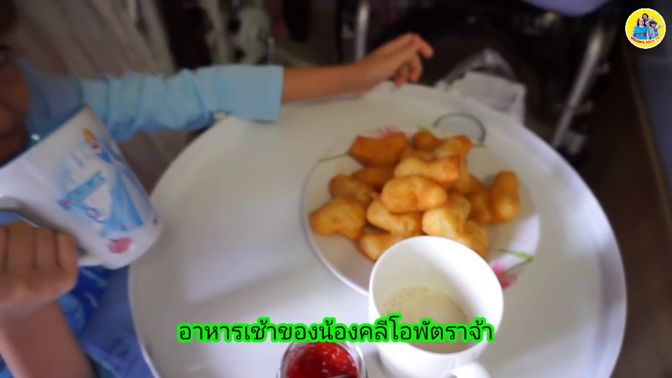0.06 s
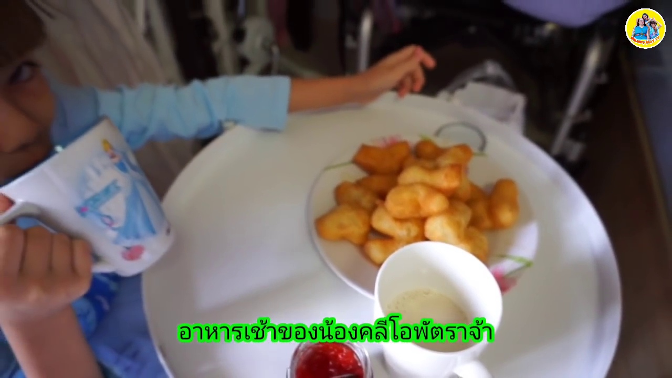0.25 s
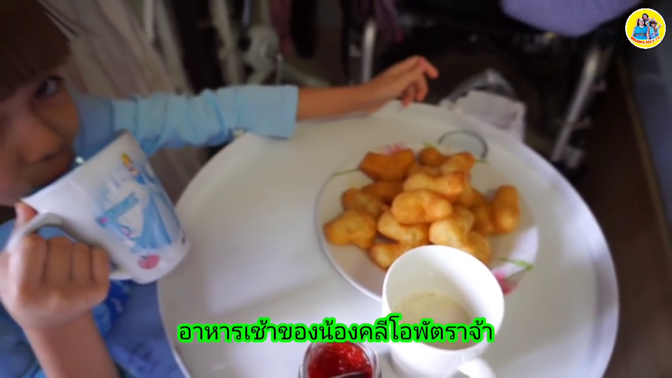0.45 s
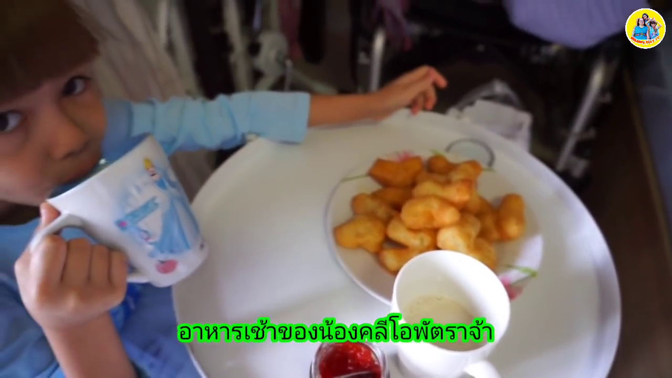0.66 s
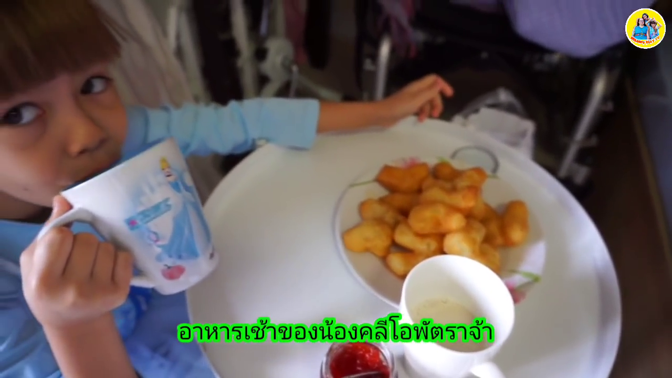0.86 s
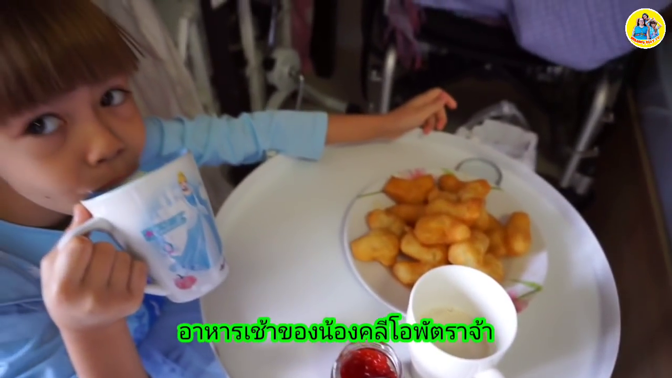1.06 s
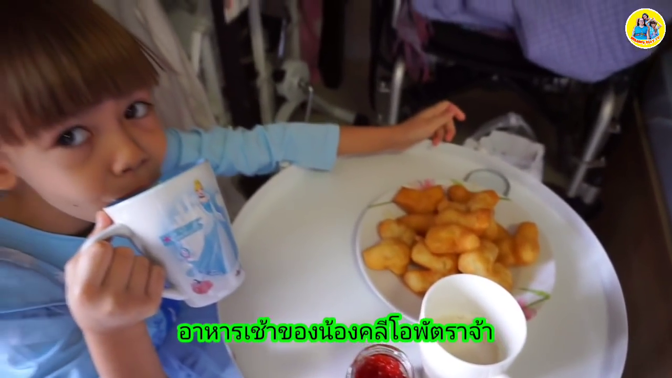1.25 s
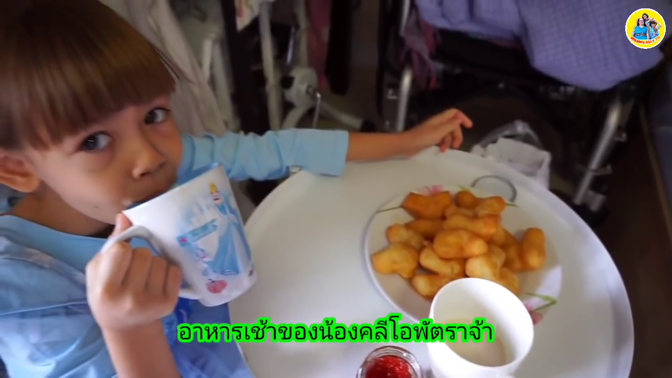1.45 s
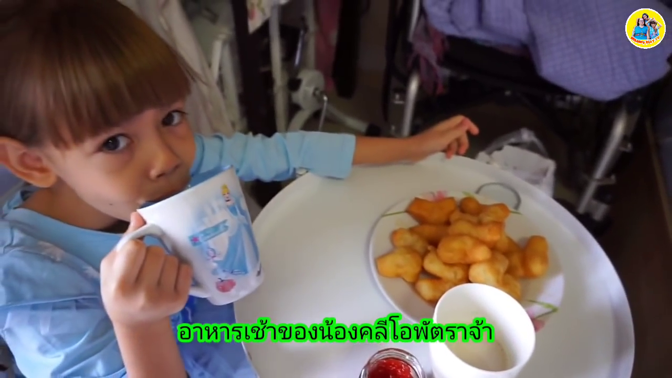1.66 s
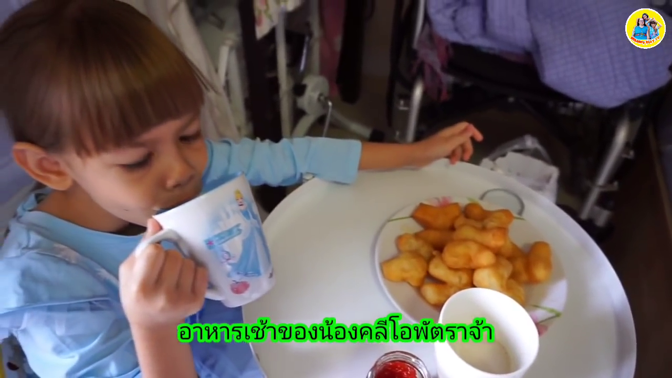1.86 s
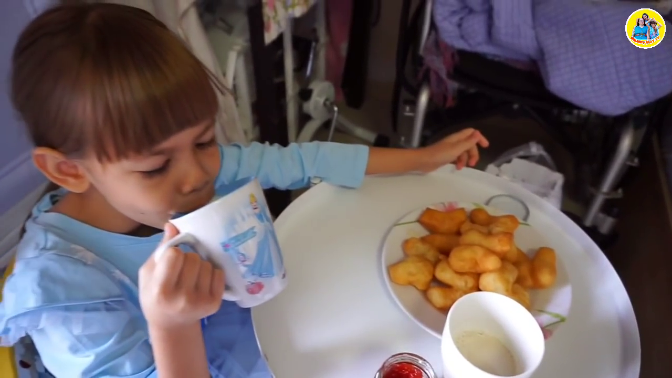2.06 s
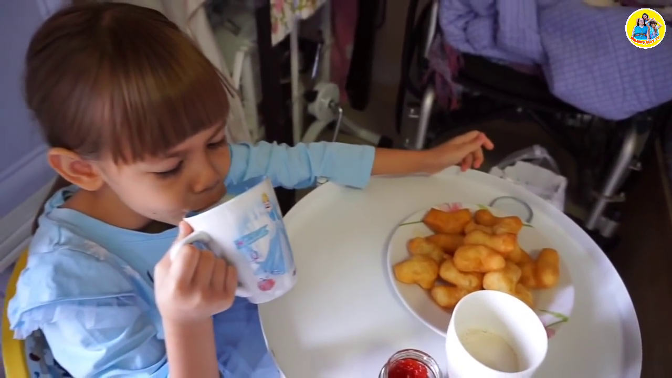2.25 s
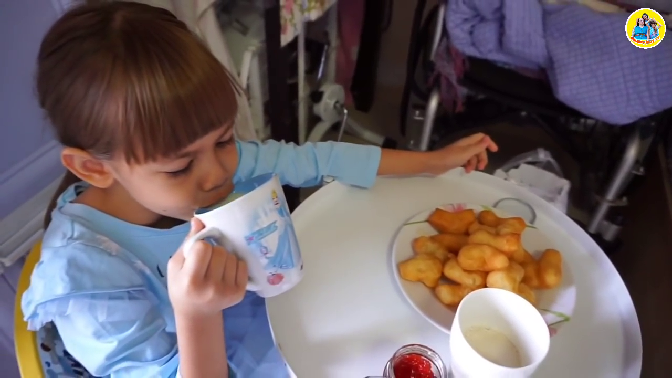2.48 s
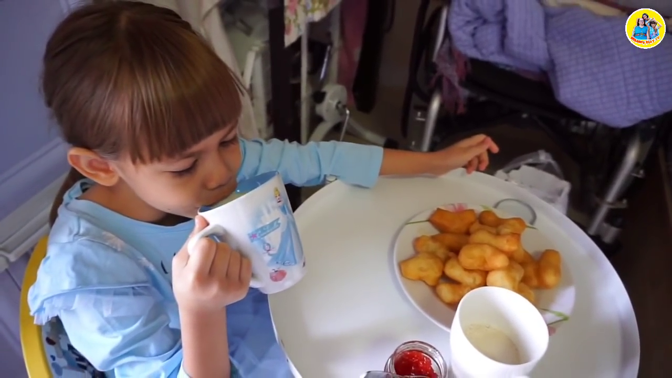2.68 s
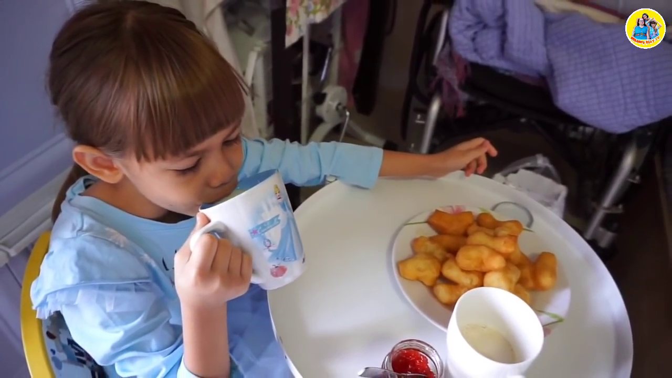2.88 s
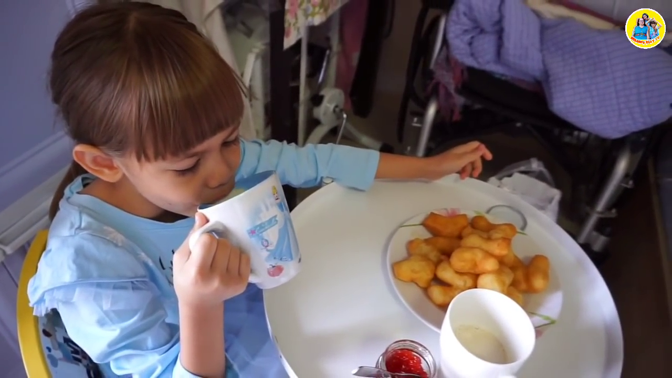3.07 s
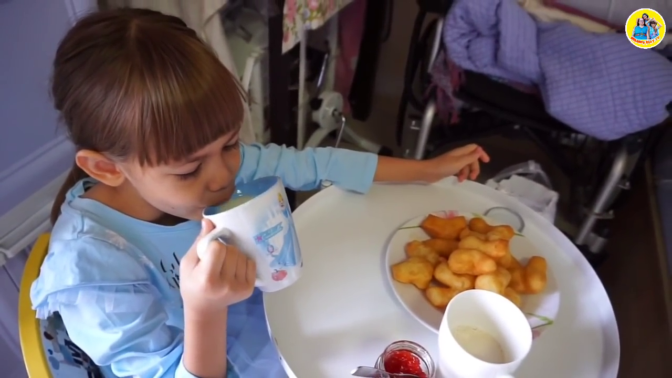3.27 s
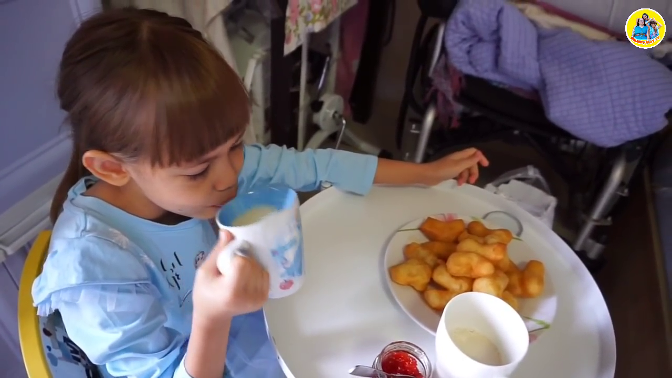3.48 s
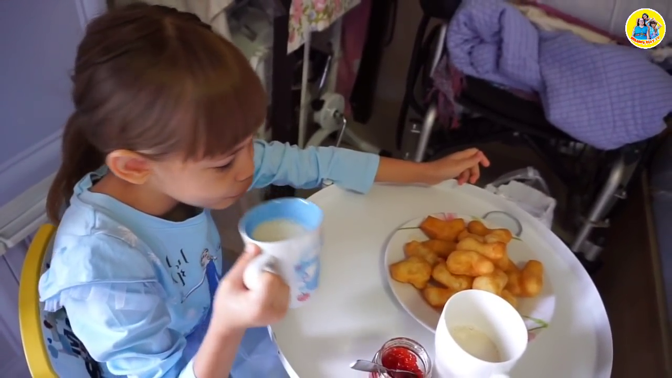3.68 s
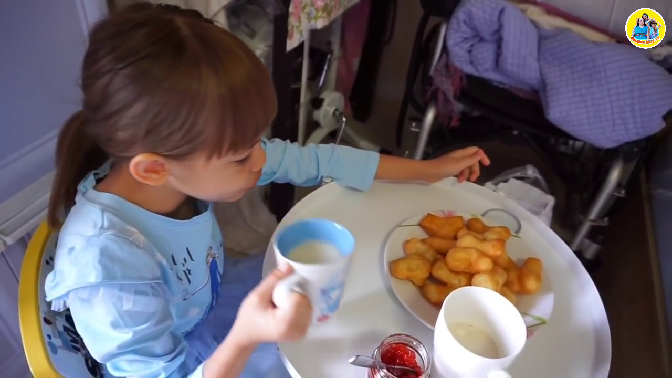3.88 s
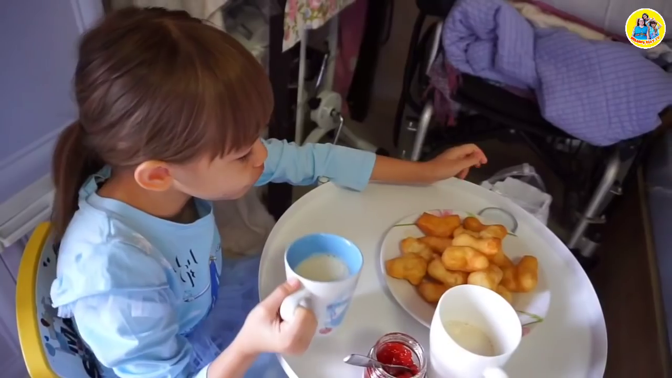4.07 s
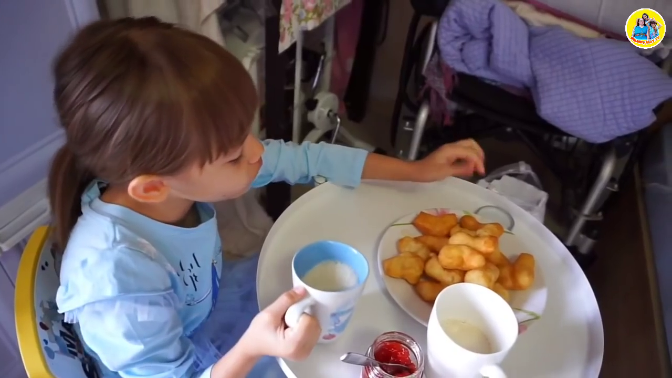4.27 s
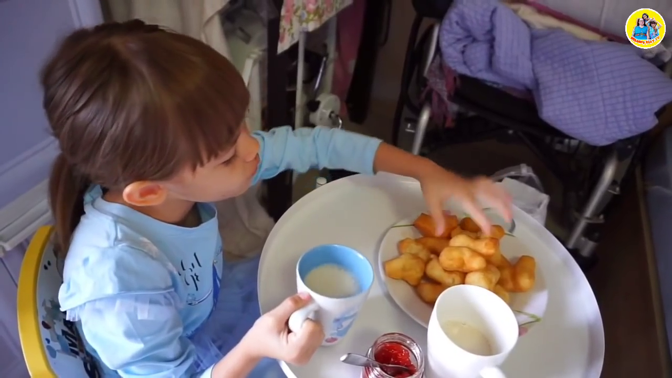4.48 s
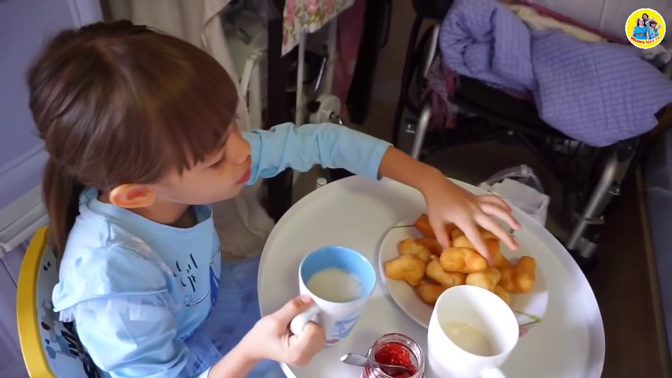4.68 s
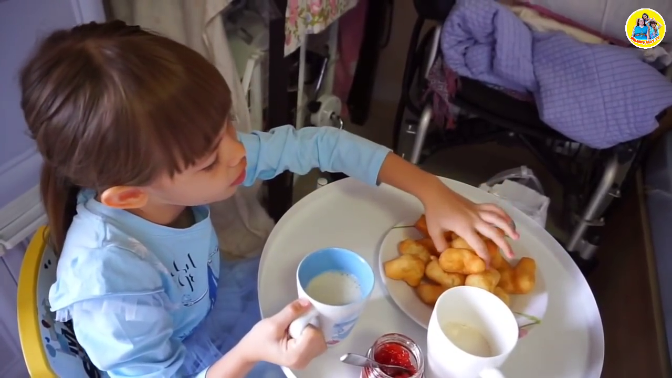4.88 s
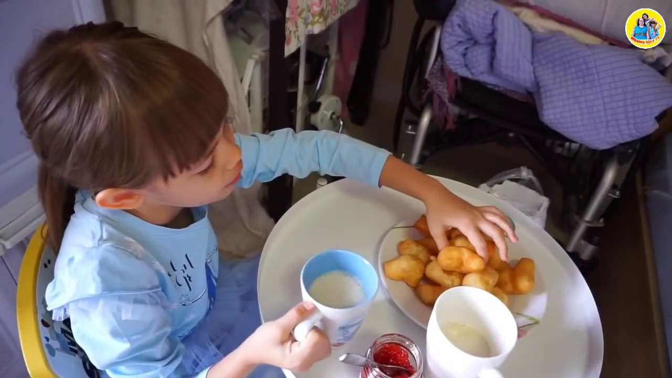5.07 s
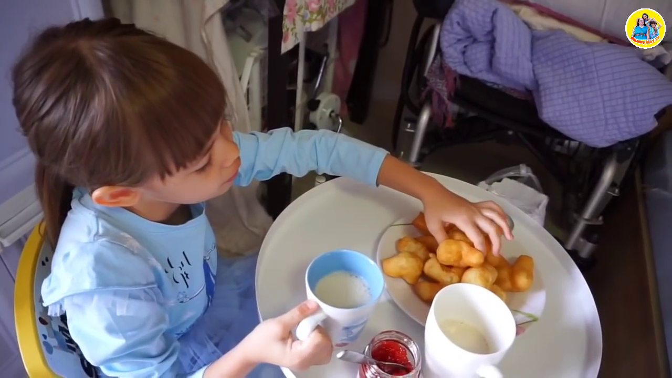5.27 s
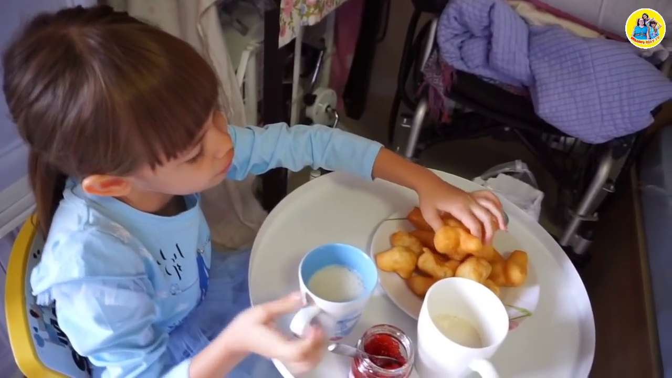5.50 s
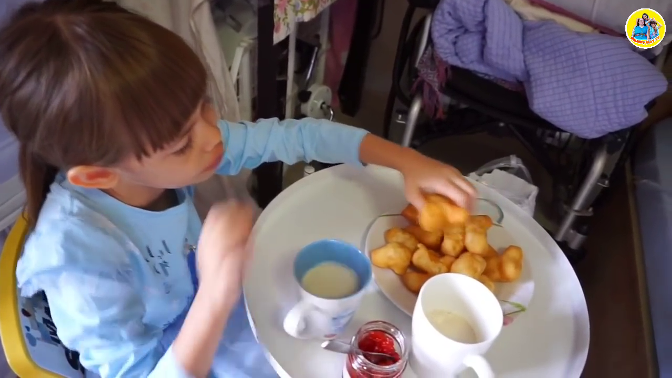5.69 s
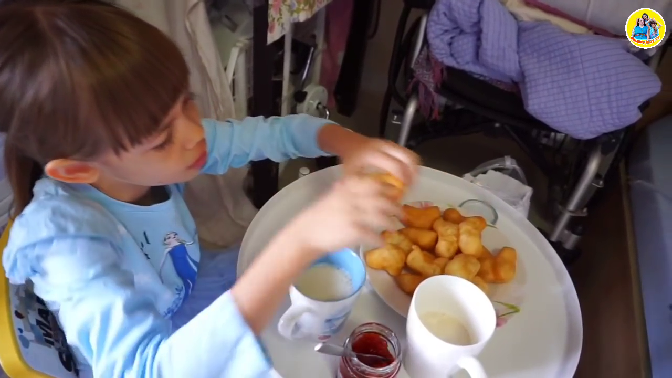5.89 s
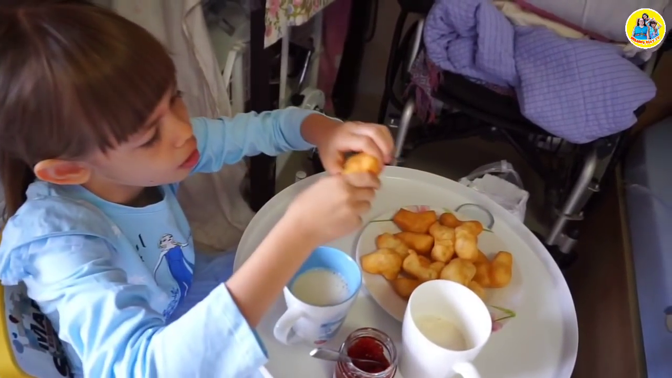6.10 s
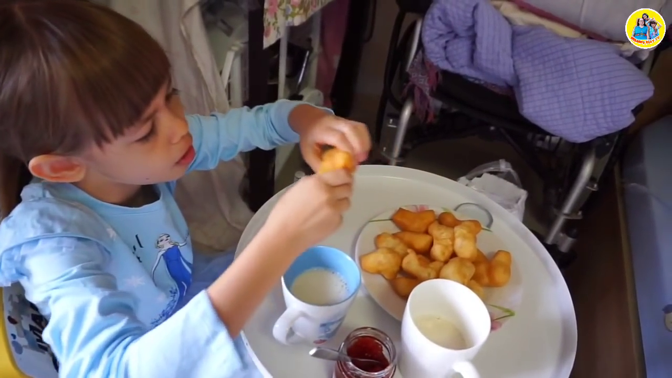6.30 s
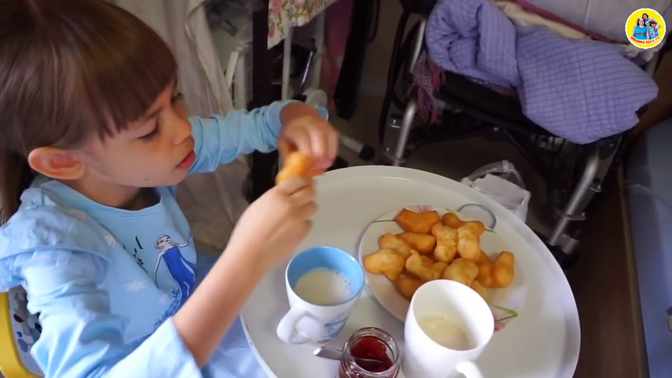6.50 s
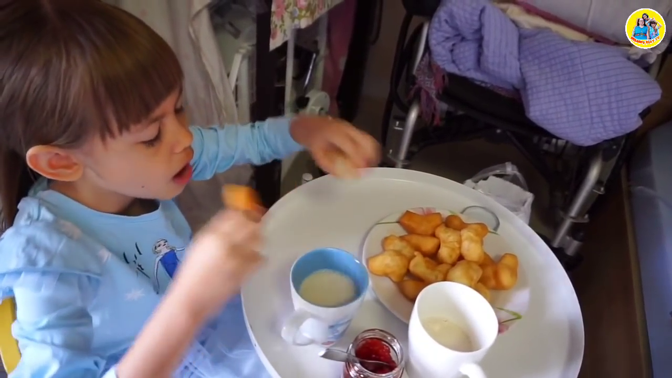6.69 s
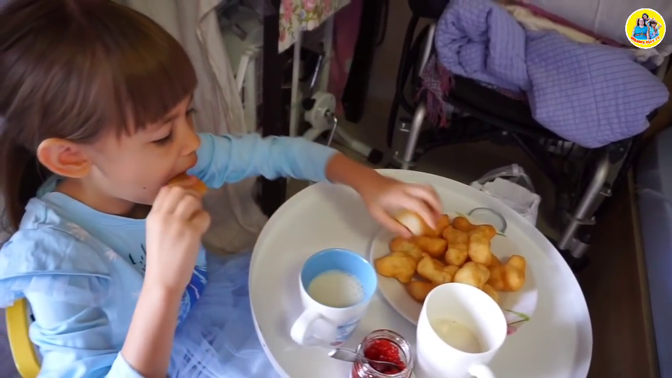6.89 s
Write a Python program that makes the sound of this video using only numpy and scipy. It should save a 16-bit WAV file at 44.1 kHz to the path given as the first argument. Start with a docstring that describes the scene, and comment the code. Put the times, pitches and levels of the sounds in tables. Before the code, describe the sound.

Steady outdoor hiss and thin birdsong through a window; one loud mug knock past the middle, then fingers quietly rustle and tear crisp fried dough.

```python
"""Mug set down on a table

A ceramic mug is set down hard on a light table in a small room, right of a two-port camera microphone: damped
sine partials, a low thud and a dense tail of noise. Steady outdoor hiss (shaped noise) and small birds (gliding
sines, once with a breathy noise smear) come in through a window, over a faint low hum (narrow-band noise).
Fingers rustle and tear crisp fried dough: short noise bursts and showers of grains."""
import sys
import numpy as np
from scipy import signal
from scipy.fft import rfft, irfft, next_fast_len
from scipy.io import wavfile
from scipy.ndimage import uniform_filter1d

SR = 44100
rng = np.random.default_rng(int(sys.argv[2]) if len(sys.argv) > 2 else 0)


def store_pcm(level_fs):
    """Save levels as 16-bit WAV."""
    pcm = np.round(np.clip(level_fs, -1, 1) * 32767).astype(np.int16)
    wavfile.write(sys.argv[1], SR, np.atleast_2d(pcm).T)


N = 306306
ROOM_T60_S = .28


def undb(db):
    """Decibel law: the amplitude ratio is ten to the power dB / 20."""
    return 10 ** (np.asarray(db) / 20)


def level(x, db):
    """Energy scaling: the root-mean-square amplitude is brought to a level in dB."""
    return x * undb(db) / np.sqrt(np.mean(x ** 2))


def along(table, column, size):
    """Spectral interpolation: a column is read at every bin, straight on a log-frequency axis."""
    rows = np.array(table)
    bins_hz = np.fft.rfftfreq(size, 1 / SR)
    return np.interp(np.log(bins_hz + 1), np.log(rows[:, 0]), rows[:, column])


def walk(rate):
    """Smoothed random modulation: levels held 1 / rate s and slewed twice, with a spread near 1."""
    k = int(SR / rate)
    held = np.repeat(rng.standard_normal(N // k + 1), k)
    return 1.53 * uniform_filter1d(uniform_filter1d(held, k), k)[:N]


def add(out, at_s, sound):
    """Superposition: a short sound is summed into a track from its start time."""
    i = int(at_s * SR)
    n = min(sound.shape[-1], N - i)
    out[..., i:i + n] += sound[..., :n]


def band(x, lo_hz, hi_hz):
    """Band limitation: a Butterworth filter passes the range between two corners."""
    corners = [lo_hz, min(hi_hz, .45 * SR)]
    return signal.sosfilt(signal.butter(2, corners, "bandpass", fs=SR, output="sos"), x)


def panned(pan_db):
    """Level difference: left minus right in dB, shared evenly between the two ports."""
    return undb([[pan_db / 2], [-pan_db / 2]])


def echoes(x, t60, onset_s):
    """Diffuse reverberation: dense reflections, unlike at each port, build up and die away; unit energy."""
    t = np.arange(SR // 2) / SR
    tail = rng.standard_normal((2, len(t))) * (1 - np.exp(-t / onset_s)) * 1000 ** (-t / t60)
    unit = tail / np.sqrt(np.sum(tail ** 2, axis=1, keepdims=True))
    return signal.fftconvolve(x[None], unit, axes=1)[:, :N]


# Spectrum of the steady hiss. Each row: frequency in Hz, relative density in dB per Hz.
HISS_SPECTRUM = [(24, -69), (40, -62), (139, -26.5), (275, -4.5), (419, -10.5), (556, -2.5), (911, -0.5),
                 (1150, -2.5), (1420, -1), (1680, -4), (2390, -5.5), (5070, -19), (9550, -26.5),
                 (11000, -29.5), (14300, -74), (22000, -120)]
HISS_DB = -48.5
# Coherence of the hiss between the ports. Each row: frequency in Hz, likeness from 0 to 1,
# phase of right against left in rad, level of left minus right in dB.
PORT_COHERENCE = [(172.0, 0.89, -0.1, 0.3), (344.0, 0.84, -0.1, -0.3), (689.0, 0.7, -0.1, -2.0),
                  (1205.0, 0.45, -0.2, -1.2), (1722.0, 0.27, -1.0, -1.4), (2411.0, 0.16, -1.0, -1.9),
                  (3273.0, 0.29, -2.0, -2.8), (4134.0, 0.35, -2.3, -1.2), (5167.0, 0.28, -2.5, -2.9),
                  (6201.0, 0.23, -2.7, -3.2), (7407.0, 0.06, -1.3, -2.9), (8957.0, 0.16, -0.2, -2.6),
                  (10680.0, 0.11, -0.2, -2.7)]


def hiss(swell_db=.5, flicker_db=0.63):
    """Partial coherence: the ports agree in the bass and part in the treble; octaves swell and flicker."""
    size = next_fast_len(N)
    a, b = rfft(rng.standard_normal((2, size)))
    alike = np.clip(along(PORT_COHERENCE, 1, size), 0, 1)
    phase = along(PORT_COHERENCE, 2, size)
    pan = undb(along(PORT_COHERENCE, 3, size) / 2)
    right = alike * np.exp(1j * phase) * a + np.sqrt(1 - alike ** 2) * b
    both = np.array([a * pan, right / pan]) * undb(along(HISS_SPECTRUM, 1, size))
    octave = np.log2(np.fft.rfftfreq(size, 1 / SR) + 1)
    out, swell = 0, walk(2.68)
    for centre in range(0, 16):
        # overlapping triangular octaves: one swell is common to all, each has a flicker of its own
        share = np.clip(1 - np.abs(octave - centre), 0, 1)
        gain = undb(swell_db * swell + flicker_db * walk(5))
        out = out + gain * irfft(both * share, size)[:, :N]
    return level(out, HISS_DB)


# Low resonance under the hiss. The row: centre in Hz, width in Hz, level in dB.
HUM_BAND = (101, 23, -89.5)


def hum():
    """Narrow-band noise: a faint low hum whose level wavers at random."""
    hz, width_hz, db = HUM_BAND
    noise = band(rng.standard_normal(N), hz - width_hz / 2, hz + width_hz / 2)
    return level(noise * undb(3 * walk(1.5)), db)


def whistles(notes):
    """Frequency and amplitude modulation: gliding sines start sharply, warble and break up."""
    dry, warble, flutter = np.zeros(N), walk(200), walk(130)
    for at_s, length, hz0, hz1, db in notes:
        t = np.arange(int(length * SR)) / SR
        here = np.minimum(int(at_s * SR) + np.arange(len(t)), N - 1)
        glide = hz0 + (hz1 - hz0) * t / length
        hz = glide * (1 + .012 * warble[here])
        shape = (1 - np.exp(-t / 0.003)) * np.sqrt(np.cos(np.pi / 2 * t / (t[-1] + 1 / SR)))
        tone = np.sqrt(2) * np.sin(2 * np.pi * np.cumsum(hz) / SR)
        add(dry, at_s, undb(db + 4 * flutter[here]) * shape * tone)
    return dry


def calls(table, contour):
    """Phase integration: one pitch contour is sung repeatedly, each time at its own pitch and level."""
    dry, (s, hz, db) = np.zeros(N), np.transpose(contour)
    t = np.arange(int(s[-1] * SR)) / SR
    for at_s, pitch, level_db in table:
        glide = pitch * np.interp(t, s, hz)
        tone = np.sqrt(2) * np.sin(2 * np.pi * np.cumsum(glide) / SR)
        add(dry, at_s, undb(level_db + np.interp(t, s, db)) * tone)
    return dry


# A songbird's repeated phrase, a chirrup and then whistles. Each row: start in seconds, pitch factor of the
# chirrup, its level in dB, rising note in Hz, its level in dB, held note in Hz, its level in dB,
# level of the held note's repeat in dB.
SONG_PHRASES = [(.468, 0.99, -51.5, 4300, -66, 3500, -60, -59),
                (.925, 1.01, -54, 4360, -61, 3500, -56.5, -54.5),
                (1.346, .99, -47, 4230, -57, 3400, -54.5, -65),
                (1.76, .97, -48, 4420, -62, 3515, -52.5, -62.5),
                (2.174, 0.97, -47, 4470, -64, 3620, -58, -64),
                (2.621, 1.0, -49.5, 4100, -59, 3325, -53, -63),
                (3.077, .98, -44.5, 4260, -61, 3366, -53.5, -61.5),
                (3.55, 0.95, -45.5, 4170, -59, 3490, -55, -69)]
# a short pip at the chirrup's pitch factor and relative to its level; starts are from that of the phrase
PIP_S, PIP_LENGTH_S, PIP_HZ, PIP_DB = .138, 0.027, 3150, -8
RISING_S, RISING_LENGTH_S, RISING_SPAN_HZ = .143, 0.051, 200
HELD_S, HELD_LENGTH_S, HELD_SAG_HZ = .19, 0.094, 29.6
AGAIN_S, AGAIN_LENGTH_S = .305, 0.095


def phrase_notes():
    """Linear glides: each phrase yields a steady pip, a rising note, a sagging held note and its repeat."""
    notes = []
    for at_s, pitch, db, rising_hz, rising_db, held_hz, held_db, again_db in SONG_PHRASES:
        pip_hz, half_span = pitch * PIP_HZ, RISING_SPAN_HZ / 2
        sagged_hz = held_hz - HELD_SAG_HZ
        notes += [(at_s + PIP_S, PIP_LENGTH_S, pip_hz, pip_hz, db + PIP_DB),
                  (at_s + RISING_S, RISING_LENGTH_S, rising_hz - half_span, rising_hz + half_span, rising_db),
                  (at_s + HELD_S, HELD_LENGTH_S, held_hz, sagged_hz, held_db),
                  (at_s + AGAIN_S, AGAIN_LENGTH_S, held_hz, sagged_hz, again_db)]
    return notes


# Single whistled notes of other birds. Each row: start in seconds, length in seconds, first frequency in Hz,
# last frequency in Hz, level in dB.
OTHER_WHISTLES = [(0, 0.05, 3690, 3700, -63), (2.45, 0.17, 4500, 4550, -67),
                  (2.676, 0.033, 3450, 3445, -48), (4.389, 0.051, 3540, 3370, -50),
                  (6.083, 0.26, 2330, 1918, -58.5), (6.57, 0.03, 3700, 3960, -61),
                  (6.628, 0.022, 3150, 2720, -45), (6.641, 0.025, 3450, 3440, -51.5),
                  (6.724, 0.019, 2975, 2800, -53), (6.742, 0.029, 2125, 2100, -53),
                  (6.935, 0.013, 3090, 3020, -38)]
# The chirrup, a steep zigzag of pitch. Each row: time after its start in seconds, frequency in Hz, level in dB.
CHIRRUP_CONTOUR = [(0, 3350, -25), (.004, 3200, -5), (.013, 2900, -6), (.022, 2950, -50), (.031, 3500, -5),
                   (.041, 2550, -9), (.049, 3650, -5), (.054, 3300, 0), (.064, 3000, 0), (.07, 2750, -30)]
# A small bird's high chips. Each row: start in seconds, pitch factor, level in dB.
CHIP_CALLS = [(.32, 1.01, -53), (.61, .95, -64), (1.892, 1.0, -52), (3.19, .93, -60), (3.728, 1.02, -56),
              (4.714, 1.01, -54), (5.24, 1.0, -53), (5.81, .985, -53)]
# One chip, stepping down. Each row: time after its start in seconds, frequency in Hz, level in dB.
CHIP_CONTOUR = [(0, 6100, -20), (.008, 6800, -2), (.022, 6850, 0), (.03, 6300, -8), (.034, 6800, -5),
                (.044, 6850, -6), (.047, 5800, -30), (.051, 5700, -6), (.062, 5600, -8), (.068, 5300, -40)]
WINDOW_LAG = 4  # samples by which the direct song reaches the left port later
YARD_T60_S, YARD_DB = .33, -3.5


def birds(pan_db=-1):
    """Arrival-time difference: song reaches the right port first; the yard's echoes lose the treble."""
    chirrups = calls([row[:3] for row in SONG_PHRASES], CHIRRUP_CONTOUR)
    dry = whistles(phrase_notes() + OTHER_WHISTLES) + chirrups + calls(CHIP_CALLS, CHIP_CONTOUR)
    delayed = np.pad(dry, (WINDOW_LAG, 0))[:N]
    direct = np.array([delayed, dry]) * panned(pan_db)
    return direct + undb(YARD_DB) * echoes(band(dry, 1500, 5600), YARD_T60_S, .01)


# Crust cracking. Each row: start in seconds, peak in dB before pan and echoes, centre frequency in Hz.
CRUST_CRACKS = [(6.168, -47, 7000), (6.176, -45, 9000), (6.281, -43, 4500), (6.307, -43, 5500),
                (6.329, -44, 8050), (6.388, -40, 9000), (6.543, -44, 3500)]
# Short noise showers: the first a breathy smear with the birdsong, the others fingers rubbing over the dough.
# Each row: start in seconds, length in seconds, level in dB before fades, pan and echoes.
NOISE_SHOWERS = [(1.137, 0.053, -69), (5.049, 0.29, -64.5), (6.259, 0.13, -61.5), (6.501, .08, -63.5)]


def cracks_and_showers(pan_db=-3, wet_db=-3):
    """Impulsive noise: cracks are bursts about a millisecond long, showers are dense tiny grains."""
    dry, t = np.zeros(N), np.arange(400) / SR
    for at_s, db, hz in CRUST_CRACKS:
        burst = band(rng.standard_normal(len(t)) * np.exp(-t / 0.0013), 0.51 * hz, 1.5 * hz)
        add(dry, at_s, undb(db) * burst / np.abs(burst).max())
    for at_s, length, db in NOISE_SHOWERS:
        n = int(length * SR)
        grains = rng.standard_normal(n) * undb(2.5 * rng.exponential(size=n))
        fade = np.sin(np.pi * np.arange(n) / n)
        add(dry, at_s, level(band(grains, 1500, 8900), db) * fade)
    return dry * panned(pan_db) + undb(wet_db) * echoes(dry, ROOM_T60_S, .003)


# Damped partials heard after the blow, in the small room; the last row a very short slap.
# Each row: frequency in Hz, relative level in dB, time to decay by 60 dB in seconds.
DAMPED_PARTIALS = [(268, -27, 0.28), (481, -26, 0.55), (733, -12.5, 0.32), (863, -5, 0.28), (879, -11, 0.3),
                   (974, -17, 0.28), (1193, -18, 0.36), (1328, -15.5, 0.3), (1508, -12, 0.26),
                   (1694, -25, .2), (1900, -18, 0.31), (2030, -7.5, 0.28), (2176, -16, 0.19),
                   (2290, -13.5, 0.29), (2370, -10, 0.18), (2440, -13, 0.31), (2570, -16, 0.35),
                   (2786, -10.5, 0.26), (3926, -16, 0.21), (4100, -28, .18), (1020, -12, 0.009)]


def damped_partials(t, spread_s):
    """Superposition of damped sines: the partials sum to the ring, dephased between the ports."""
    hz, db, t60 = np.transpose(DAMPED_PARTIALS)[:, :, None]
    chance = rng.standard_normal((len(hz), 2))
    # each partial gets a random phase step between the ports, growing with frequency
    skew = 2 * np.pi * hz * spread_s * chance[:, 1:]
    # the level of each partial wavers, so it dies unevenly
    waver_db = 4 * np.array([walk(80)[:SR] for _ in hz])
    envelope = undb(db + waver_db) * 1000 ** (-t / t60)
    phase = 2 * np.pi * hz * t + 0.62 * chance[:, :1]
    return np.array([np.sum(envelope * np.sin(phase + side * skew), axis=0) for side in (1, -1)])


# Colour of the blow as the walls return it. Each row: frequency in Hz, relative density in dB per Hz.
WALL_COLOUR = [(35, -75), (60, -55), (144, -26), (567, -13.5), (858, -0.5), (1070, -5.5), (1880, -7),
               (2340, -2), (3240, -14.5), (3860, -13.5), (11000, -32), (14300, -68), (22000, -120)]


def wall_tail(t, tail_db, alike_hz):
    """Diffuse-field coherence: the walls return dense noise, alike at both ports for long waves only."""
    alike = 1 / (1 + (np.fft.rfftfreq(SR, 1 / SR) / alike_hz) ** 4)
    shared, own = rfft(rng.standard_normal(SR)), rfft(rng.standard_normal((2, SR)))
    mixed = np.sqrt(alike) * shared + np.sqrt(1 - alike) * own
    noise = irfft(mixed * undb(along(WALL_COLOUR, 1, SR)), SR)
    return level(noise, tail_db) * (1 - np.exp(-t / 0.00058)) * 1000 ** (-t / ROOM_T60_S)


# Low resonance of the table. The row: frequency in Hz, width in Hz, level in dB before onset and decay.
TABLE_THUD = (170, 18, -40.5)


def table_thud(t):
    """Damped resonance: the width of the table's low resonance sets how fast its thud decays."""
    hz, width_hz, db = TABLE_THUD
    envelope = (1 - np.exp(-t / 0.016)) * np.exp(-np.pi * width_hz * t)
    return undb(db) * envelope * np.sin(2 * np.pi * hz * t)


# The blow. Each row: start in seconds, gain of ring and tail in dB.
BLOWS = [(4.251, -6)]


def knock(pan_db=-4.0, shade_hz=400, tail_db=-12, ring_db=-13, spread_s=.00005, alike_hz=1500):
    """Impact response: damped partials ring, the table thuds, and the walls return a dense tail."""
    out, t = np.zeros((2, N)), np.arange(SR) / SR
    for at_s, gain_db in BLOWS:
        ring = damped_partials(t, spread_s) * (1 - np.exp(-t / .00025))
        tail = wall_tail(t, tail_db, alike_hz)
        blow = band(undb(gain_db) * (tail - undb(ring_db) * ring), 220, 18000)
        # the camera body shades the left port from all but the bass
        shaded = signal.sosfilt(signal.butter(1, shade_hz, "highpass", fs=SR, output="sos"), blow)
        add(out, at_s, blow + shaded * (panned(pan_db) - 1) + table_thud(t))
    return out


def scene():
    """Linear superposition: all the sources add at the two ports."""
    return hiss() + hum() + birds() + cracks_and_showers() + knock()


TOP_HZ = 11100


def record(dry):
    """Low-pass filtering: the recorder cuts the top steeply with an elliptic filter."""
    return signal.sosfilt(signal.ellip(12, .3, 60, TOP_HZ, fs=SR, output="sos"), dry)


dry = scene()
out = record(dry)
store_pcm(out)
```